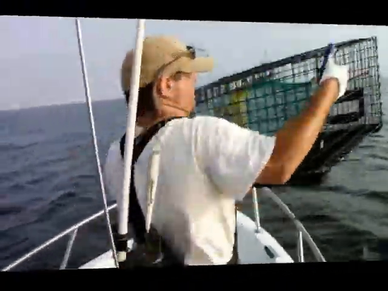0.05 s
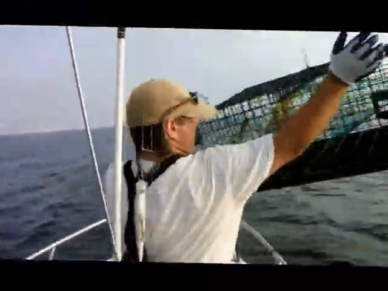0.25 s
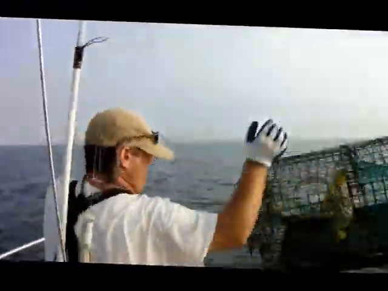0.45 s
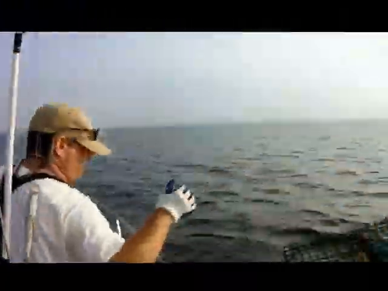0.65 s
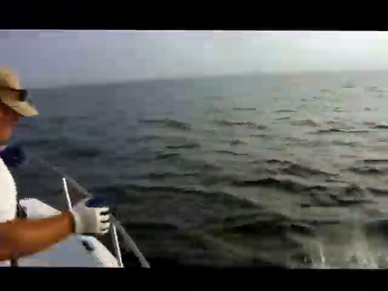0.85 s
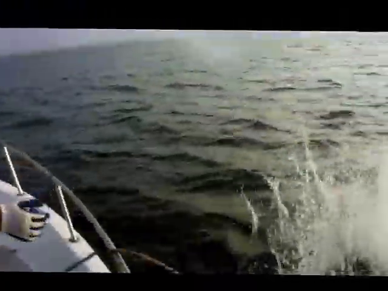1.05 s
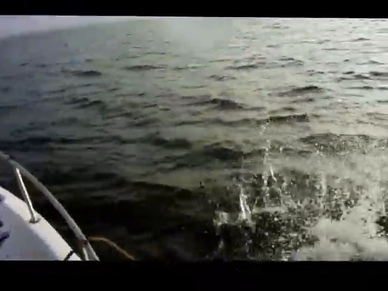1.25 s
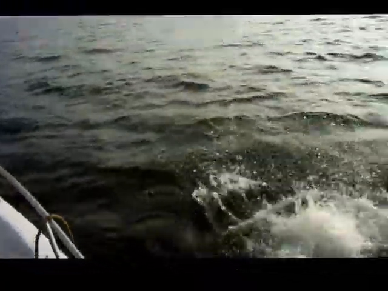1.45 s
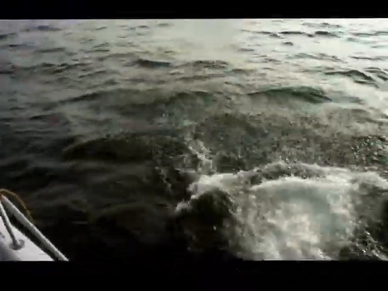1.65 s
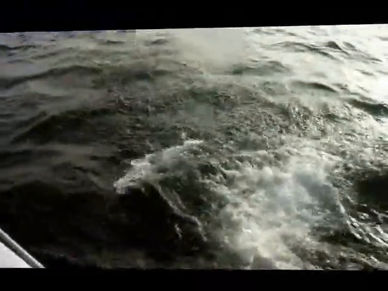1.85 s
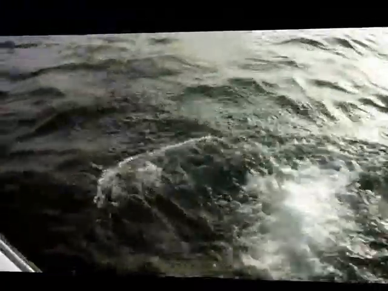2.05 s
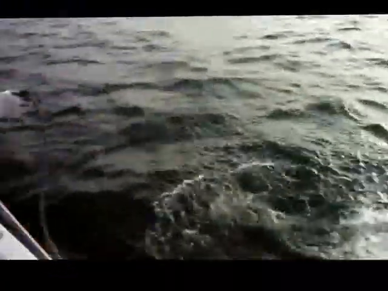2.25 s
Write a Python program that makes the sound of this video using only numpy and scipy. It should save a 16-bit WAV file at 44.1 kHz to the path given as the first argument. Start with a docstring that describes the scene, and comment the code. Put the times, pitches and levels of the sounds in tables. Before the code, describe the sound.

Loud splash of a cage thrown from a boat, then fizzing water, over wind and engine hum.

```python
"""A wire lobster trap slaps into the sea: its wires crackle through the surface, spray falls back,
and the water churns and fizzes with ringing bubbles. Just before, the trap rustles and clacks
as it is thrown from a boat. Behind it the engine idles, the sea washes, and a knocked metal
fitting jingles twice. Swirls of wind thump against the small microphone throughout."""
import sys
import numpy as np
from scipy import signal
from scipy.fft import rfft, irfft
from scipy.io import wavfile

SR = 44100
rng = np.random.default_rng(int(sys.argv[2]) if len(sys.argv) > 2 else 0)


def file_out(sig):
    """Save sig as 16-bit WAV at sys.argv[1]."""
    # one column per channel
    cols = np.atleast_2d(sig).T
    # limit, then scale
    lim = np.clip(cols, -1, 1)
    pcm = np.round(lim * 32767).astype(np.int16)
    wavfile.write(sys.argv[1], SR, pcm)


N = 105840
TIME, FREQ = np.arange(N) / SR, np.fft.rfftfreq(N, 1 / SR)


def amp(db):
    """Turns decibels into a number to multiply by."""
    return 10 ** (np.asarray(db) / 20)


def evened(x):
    """Scales a sound to a standard strength (rms 1)."""
    return x / np.sqrt(np.mean(x ** 2) + 1e-20)


def curve(rows, column=1, before=None):
    """Joins the points of a time table with straight lines."""
    rows = np.array(rows)
    return np.interp(TIME, rows[:, 0], rows[:, column], left=before)


def level(rows):
    """Volume over time from a table, silent until its first row."""
    return amp(curve(rows, before=-np.inf))


def shape(tone):
    """How much a tone table turns each frequency up or down."""
    hz, db = np.transpose(tone)
    return amp(np.interp(np.log(FREQ + 1), np.log(hz), db))


def coloured(x, tone):
    """Gives a sound a tone, at standard strength."""
    return evened(irfft(rfft(x) * shape(tone), N))


def wander(hz):
    """A smooth random wobble, up to about hz times a second."""
    return evened(irfft(rfft(rng.standard_normal(N)) * np.exp(-(FREQ / hz) ** 2), N))


def clicks(per_s, spread_db):
    """Random clicks, mostly small with a few large."""
    size = amp(spread_db * np.minimum(rng.exponential(1, N), 4))
    return size * rng.choice([-1, 1], N) * (rng.random(N) < per_s / SR)


def add(mix, start_s, sound):
    """Mixes a sound in at a given time."""
    part = mix[max(round(start_s * SR), 0):][:len(sound)]
    part += sound[:len(part)]


# The tone of the sea: frequency_hz, gain_db
SEA_TONE = [(20, -12), (160, 3), (650, -7), (1000, -10.5), (4000, -38.5), (8000, -46)]
def sea(level_db=-39.5):
    """The sea washes steadily around the boat."""
    return amp(level_db) * coloured(rng.standard_normal(N), SEA_TONE)


# The engine's two low notes: pitch_hz, level_db
ENGINE_NOTES = [(86.1, -44.5), (172.4, -34)]
def engine():
    """The idling engine hums, wavering a little in volume and pitch."""
    hum = np.zeros(N)
    for hz, db in ENGINE_NOTES:
        volume = amp(db + 0.34 * wander(21))
        pitch_hz = hz * (1 + 0.015 * wander(13))
        hum += volume * np.sin(2 * np.pi * np.cumsum(pitch_hz) / SR)
    return np.sqrt(2) * hum


# How loud the breeze is: time_s, level_db
BREEZE_LEVELS = [(0, -28), (.72, -27.5), (1.0, -28), (1.15, -22), (1.35, -13.5), (1.9, -26), (2.08, -24.5),
                 (2.24, -33.5)]
# Its tone: frequency_hz, gain_db
BREEZE_TONE = [(20, -20), (80, -8.5), (140, 3.5), (230, 0.5), (350, -6), (1200, -31), (4000, -46)]
def breeze():
    """Air flows unevenly over the microphone and rumbles."""
    lumps = amp(5.9 * np.minimum(wander(64), 1))
    return level(BREEZE_LEVELS) * coloured(rng.standard_normal(N) * lumps, BREEZE_TONE)


# Thumps of wind: peak_s, half_length_s, level_db, upper_edge_hz
WIND_THUMPS = [(0.349, 0.0026, -25, 560), (0.428, 0.0029, -15.5, 490), (0.55, 0.0041, -15.5, 534),
               (0.671, 0.0024, -14.5, 505), (0.776, 0.0084, -18, 420), (0.785, 0.0016, -12.5, 500),
               (0.838, 0.0024, -14, 450), (0.849, 0.0023, -7, 450), (0.966, 0.0062, -14, 595),
               (1.046, 0.0017, -4, 450), (1.064, 0.0099, -13, 640), (1.188, 0.0079, -13, 288),
               (1.219, 0.022, -16.5, 414), (1.289, 0.0022, -6.5, 450), (1.303, 0.062, -19.5, 410),
               (1.346, 0.03, -11.5, 297), (1.435, 0.0086, -9.5, 360), (1.456, 0.0051, -8, 390),
               (1.479, 0.016, -13.5, 325), (1.55, 0.0073, -6, 344), (1.576, 0.029, -17.5, 437),
               (1.601, 0.0048, -7, 545), (1.649, 0.0033, -11.5, 450), (1.722, 0.0042, -11, 373),
               (1.812, 0.01, -14.5, 230), (1.852, 0.0016, -6, 590), (1.861, 0.018, -14.5, 400),
               (1.924, 0.027, -21, 118), (1.944, 0.0058, -14.5, 274), (2.14, 0.0025, -20, 450)]
def wind_thumps(size=4096, dip_s=0.0034):
    """Swirls of air hit the microphone; the shorter the swirl, the more it is one dip in pressure."""
    out = np.zeros(N)
    t, hz = (np.arange(size) - size / 2) / SR, np.fft.rfftfreq(size, 1 / SR)
    bass_shape = hz / np.hypot(hz, 187) ** 1.28 * hz / np.hypot(hz, 68)  # thins the deepest bass
    dip = evened(1. * (t == 0))
    for peak_s, half_s, db, edge_hz in WIND_THUMPS:
        swell = np.exp(-(t / half_s) ** 2 / 2)
        pressure = evened(rng.standard_normal(size) * swell) - dip_s / half_s * dip
        treble_cut = 1 / np.hypot(1, (hz / edge_hz) ** 3.7)
        faint_treble = amp(-33.5) / (1 + (hz / edge_hz / 2) ** 2)
        thump = evened(irfft(rfft(pressure) * bass_shape * (treble_cut + faint_treble)))
        add(out, peak_s + t[0], amp(db) * thump * np.sqrt(np.mean(swell ** 2)))
    return out


# Knocks on the metal fitting: start_s, level_db, focus_hz, share_of_ring_time
KNOCKS = [(0.404, -37.5, 3750, 0.15), (0.409, -45, 7200, 1), (.425, -46, 2750, 1), (.436, -45, 5350, .9),
          (.55, -48, 3750, .4), (.638, -45.5, 3400, 0.55), (2.201, -37.5, 4250, 0.83),
          (2.204, -37.5, 8600, 1)]
# The notes it rings with: pitch_hz, gain_db, ring_s (time to fade by 60 dB)
METAL_NOTES = [(2019, 1, .6), (2780, -0.5, 1), (3738, -2.5, 1), (5388, -0.5, 0.55), (6555, 0.5, 0.52),
               (8345, -2.5, 0.27), (9990, -8, .17)]
def fitting(attack_s=0.004, flutter_db=3, focus_db=32):
    """Every knock rings the same metal notes, favouring those near its focus."""
    out = np.zeros(N)
    for hz, note_db, ring_s in METAL_NOTES:
        flutter = flutter_db * wander(26)
        power = np.zeros(N)
        for start_s, db, focus_hz, share in KNOCKS:
            age = TIME - start_s
            wobble_db = flutter * np.clip(10 * age, 0, 1)  # sets in after a clean strike
            off_focus_db = focus_db * np.log2(hz / focus_hz) ** 2
            fade_db = 60 * abs(age) / (ring_s * share)
            power += amp(db + wobble_db - off_focus_db - fade_db) ** 2 * np.clip(age / attack_s, 0, 1)
        out += np.sqrt(power) * amp(note_db) * np.sin(2 * np.pi * hz * TIME)
    return out


# How loud the trap and rope rustle: time_s, level_db
RUSTLE_LEVELS = [(.1, -55), (.24, -46.5), (.5, -46), (.69, -46), (.8, -53.5)]
# Their tone: frequency_hz, gain_db
RUSTLE_TONE = [(200, -22), (2000, 5), (4000, -6), (8000, -11.5), (16000, -52)]
def rustle():
    """Mesh and rope rustle, loudest as the trap is swung out."""
    volume = amp(curve(RUSTLE_LEVELS) + 2 * wander(26))
    return volume * coloured(clicks(2500, spread_db=0.5), RUSTLE_TONE)


# Clacks and ticks of the swinging trap: start_s, level_db, pitch_hz
TRAP_CLACKS = [(0.286, -35, 1270), (0.359, -43, 6000), (0.585, -39, 8400), (0.692, -33, 1040)]
def clacks(fade_cycles=13, width_octaves=0.45):
    """The frame clacks and single wires tick; the higher the sound, the sooner it dies."""
    out = np.zeros(N)
    for start_s, db, hz in TRAP_CLACKS:
        band = np.exp(-(np.log2((FREQ + 1) / hz) / width_octaves) ** 2)
        ring = evened(irfft(rfft(rng.standard_normal(N)) * band, N))
        out += amp(db) * (TIME >= start_s) * np.exp(-abs(TIME - start_s) * hz / fade_cycles) * ring
    return out


def bubbles(sizes=36, per_s=1100, low_hz=450, high_hz=5440, fade_cycles=7.3, rise=0.047):
    """Bubbles of many sizes each ring briefly, rising in pitch."""
    out = np.zeros(N)
    for hz in np.geomspace(low_hz, high_hz, sizes) * rng.uniform(1, 1.04, sizes):
        fade_s = fade_cycles / hz
        t = np.arange(0, 5 * fade_s, 1 / SR)
        ring = np.exp(-t / fade_s) * np.sin(2 * np.pi * hz * t * (1 + rise * t / fade_s / 2))
        out += evened(signal.oaconvolve(clicks(per_s / sizes, spread_db=4), ring)[:N])
    return evened(out)


# How loud and bright the water churns: time_s, level_db, brightness_db_per_octave
CHURNING = [(1.08, -39, 6), (1.15, -20, -3), (1.19, -30.5, 3.5), (1.255, -23.5, 0), (1.3, -20.5, -0.5),
            (1.585, -19.5, 0), (1.68, -23.5, 0.5), (1.87, -24.5, 1.55), (1.99, -33, -0.1),
            (2.19, -34.5, -0.4), (2.4, -35, -1.5)]
# The tone of the spray: frequency_hz, gain_db
SPRAY_TONE = [(100, -51), (350, -5), (1050, 3), (3900, -5.5), (9000, -14), (14500, -17), (16000, -38)]
def churn():
    """Spray hisses, drops patter and bubbles ring, all swelling and settling with the water."""
    hiss = rng.standard_normal(N)
    drops = evened(clicks(2500, spread_db=3))
    spray = amp(-3) * (hiss + drops)
    uneven_spray = np.std(spray) * coloured(spray * amp(1.25 * wander(50)), SPRAY_TONE)
    water = uneven_spray + amp(-6.5) * bubbles()
    # Brighten or dull each short slice, tipping its tone like a seesaw around 2500 Hz.
    hz, t, slices = signal.stft(water, SR, nperseg=256)
    octaves = np.log2(np.maximum(hz, 500) / 2500)[:, None]
    tilt_db = np.interp(t, TIME, curve(CHURNING, column=2)) * octaves
    return level(CHURNING) * signal.istft(slices * amp(tilt_db), SR, nperseg=256)[1][:N]


# Lumps of falling water: start_s, level_db, fade_s
WATER_LUMPS = [(1.134, -20, 0.0041), (1.468, -14, 0.0073), (1.923, -34, 0.0011), (1.95, -26.5, 0.019),
               (2.043, -27, 0.0039), (2.303, -30, .003)]
# The tone of water being hit, here and in the trap's slap: frequency_hz, gain_db
SPLASH_TONE = [(100, -10), (400, -1.5), (1050, 2.5), (3800, -2.5), (9000, -9), (14500, -11.5), (16000, -21)]
def falling_water(ticks_per_s=110, tick_s=0.0005):
    """Lumps of water land with a short bright smack, and nearby drops tick over the churn."""
    smacks = sum(amp(db) * (TIME >= start_s) * np.exp(-abs(TIME - start_s) / fade_s)
                 for start_s, db, fade_s in WATER_LUMPS)
    landings = abs(clicks(ticks_per_s, spread_db=2.4))
    ticks = evened(signal.lfilter([1], [1, -np.exp(-1 / (tick_s * SR))], landings))  # each dies away
    ticks *= amp(-19) * level(CHURNING) ** 0.77  # they fade more slowly than the churn, so stand out
    return np.hypot(smacks, ticks) * coloured(rng.standard_normal(N), SPLASH_TONE)


# How loud the trap is as it hits the sea: time_s, level_db
SLAP_LEVELS = [(1.068, -52), (1.078, -36.5), (1.097, -20.5), (1.116, -17), (1.139, -13), (1.155, -24.5),
               (1.2, -21), (1.4, -73)]
def trap_slap():
    """Many wires cut the surface in a dense crackle."""
    return level(SLAP_LEVELS) * coloured(clicks(9000, spread_db=2.5), SPLASH_TONE)


def scene():
    """Everything in the open air, in one channel."""
    background = breeze() + wind_thumps() + engine() + sea()
    return (background + rustle() + trap_slap() + churn() + falling_water() + fitting() + clacks())[None]


# The small microphone's tone: frequency_hz, gain_db
MIC_TONE = [(720, -1), (1030, 1.5), (1350, 0), (1800, -4.5), (3300, 5), (3950, 8.5), (4300, 1), (4650, -4),
            (5400, 4.5), (7400, 1), (9000, 2.5), (12000, -11), (16000, -14)]
def record(dry, notch_hz=7795, notch_width_hz=60, whine_hz=7870, top_hz=15720):
    """The microphone colours the sound, and the camera adds its own hiss and whine."""
    notch = amp(-21 / (1 + ((FREQ - notch_hz) / notch_width_hz) ** 2))  # turns one narrow band down
    hiss = amp(-57.5) * rng.standard_normal(N)
    whine = amp(-67) * np.sqrt(2) * np.sin(2 * np.pi * whine_hz * TIME)
    heard = irfft(rfft(dry) * shape(MIC_TONE) * notch, N) + hiss + whine
    heard = heard / (1 + heard ** 6) ** (1 / 6)  # overload rounds off the loudest peaks
    treble_cut = signal.firwin(511, top_hz, window=("kaiser", 9), fs=SR)
    return signal.oaconvolve(heard, treble_cut[None], "same")


dry = scene()
out = record(dry)
file_out(out)
```